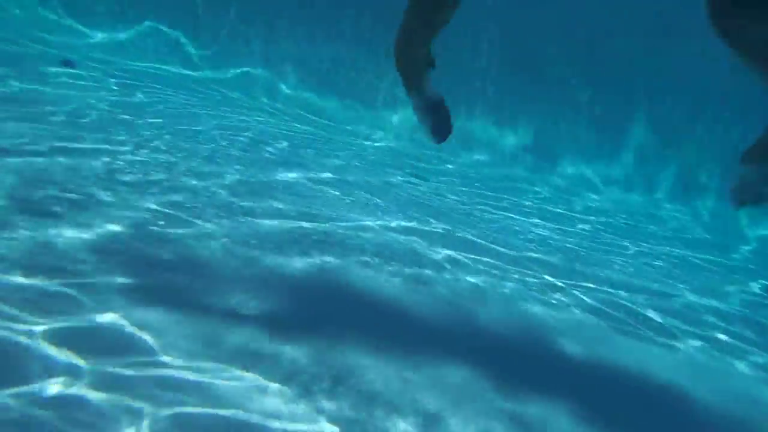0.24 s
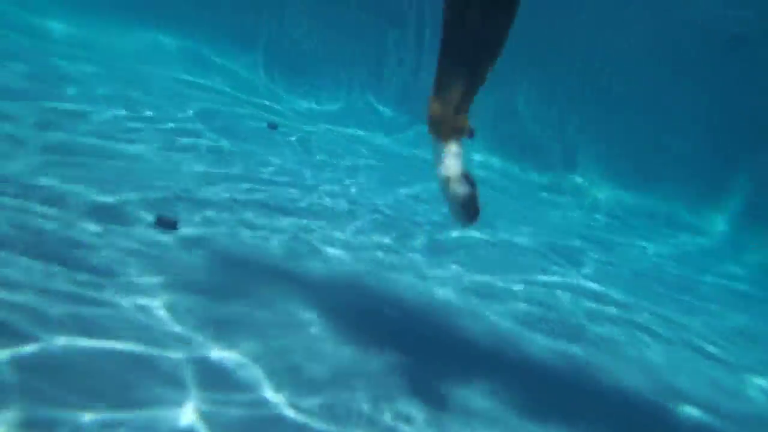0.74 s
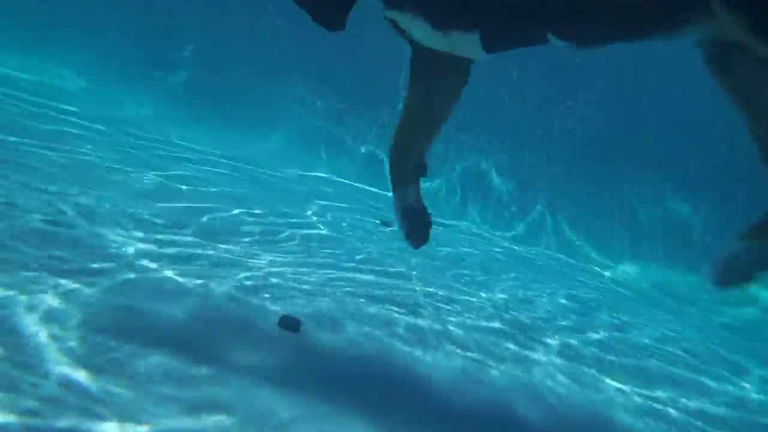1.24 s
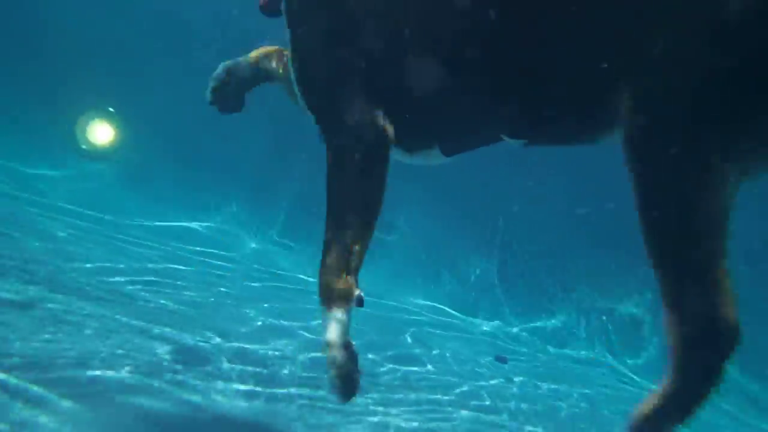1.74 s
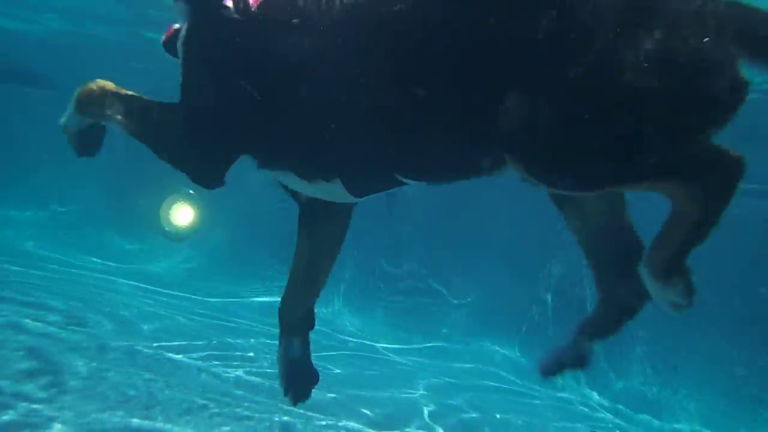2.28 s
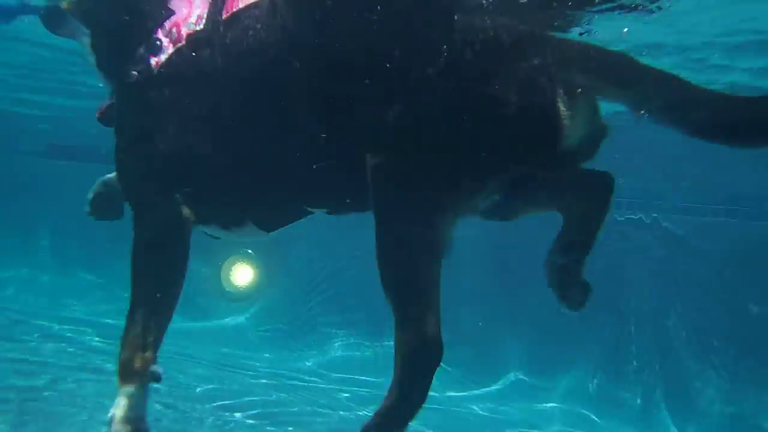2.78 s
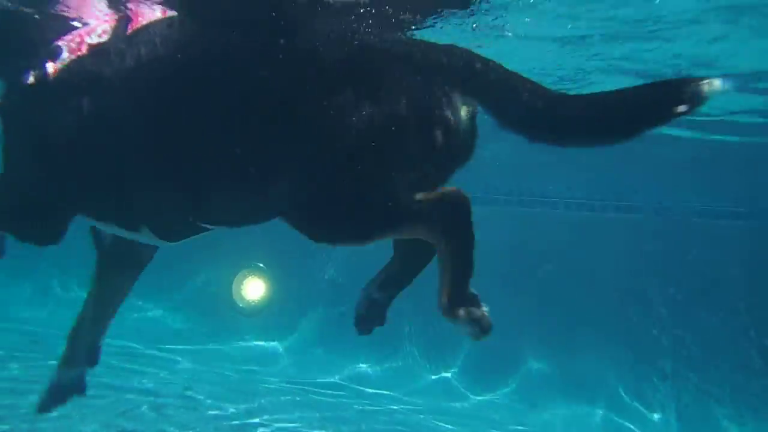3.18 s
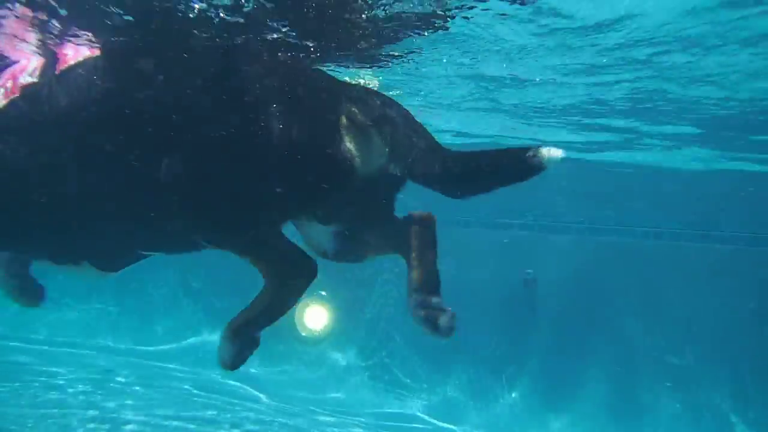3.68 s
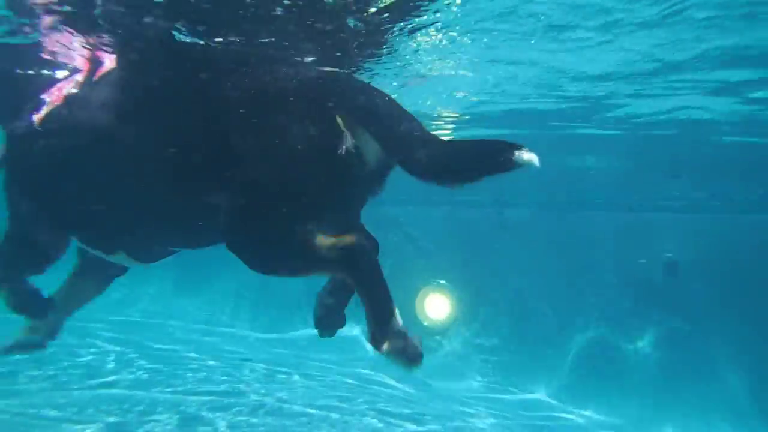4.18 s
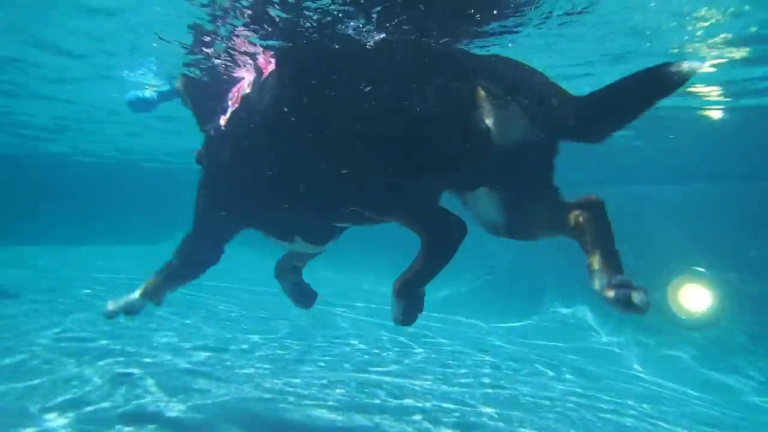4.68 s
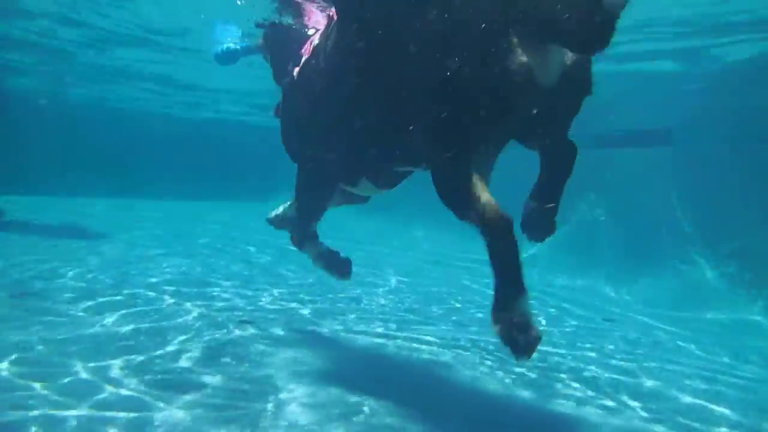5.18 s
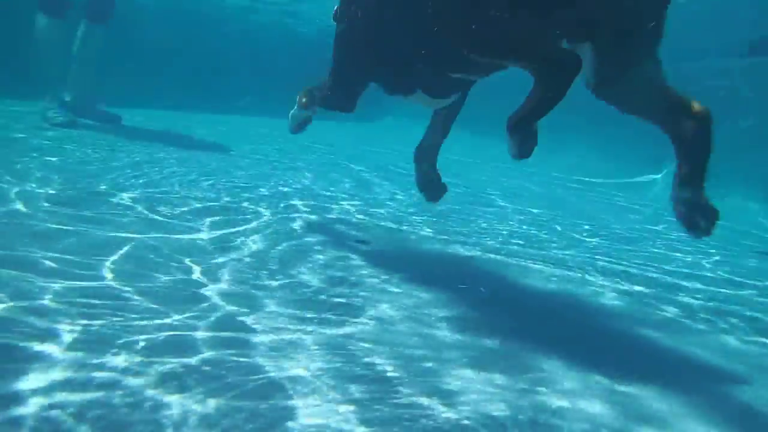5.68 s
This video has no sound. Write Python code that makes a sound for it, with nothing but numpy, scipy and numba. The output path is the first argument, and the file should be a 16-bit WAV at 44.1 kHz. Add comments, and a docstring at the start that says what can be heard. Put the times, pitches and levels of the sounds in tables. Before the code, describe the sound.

Muffled, resonant water noise opens strongly and keeps surging, coloured by the air pocket inside a submerged housing. Dull paddling slaps, rising bubble blips, faint ticks and short creaking jolts dot it. After about four seconds, close handling takes over: bassy bumps, finger rubs and hard clicks at the left side. The wash fades beneath, then swells back with low shoves, creaks and a last gurgle.

```python
"""From the start, a dog paddling past a sealed camera under water stirs a wash: noise through the modes of the case.
Strokes soon slap its air cavity, bubbles gurgle as rising tones, faint treble ticks come, and seams creak in jolts.
In mid-scene spray crackles and waves shove the case as dying low tones. Then a shifting hand thuds, rubs and ticks,
mostly at the left port, as band-shaped noise and cavity rings, while the wash sinks. At the end the wash returns,
with more shoves and creaks. A limiter holds the peaks throughout."""
import sys
import numpy as np
from scipy.fft import rfft, irfft, next_fast_len
from scipy.io import wavfile
from scipy.ndimage import uniform_filter1d, minimum_filter1d, map_coordinates
from numba import njit

SR = 44100
rng = np.random.default_rng(int(sys.argv[2]) if len(sys.argv) > 2 else 0)


def master(y):
    """Save y as 16-bit WAV."""
    cut = np.clip(np.atleast_2d(y).T, -1, 1)
    pcm = np.round(cut * 32767)  # scale
    wavfile.write(sys.argv[1], SR, pcm.astype(np.int16))


N = 261513

# Wash envelope: t/s, slosh level/dB, gulp level/dB, cavity ring level/dB, cavity f/Hz
WASH_COURSE = [(0, -13.5, -39, -16, 582.5), (.12, -25, -35, -25.5, 550), (.5, -24.5, -34, -22, 523),
               (.8, -28.5, -41, -23.5, 551), (1.15, -24.5, -36, -17, 533.3), (2.55, -25, -33.5, -16, 533.7),
               (2.74, -22, -20, -16, 581.5), (3.02, -28.5, -23.5, -19, 600), (3.4, -25.5, -31, -19, 561.5),
               (3.85, -24.5, -28, -23, 563.6), (3.95, -25, -39.5, -17, 598.8),
               (4.02, -22.5, -28, -18.5, 568), (4.14, -27.5, -27, -24, 518), (4.2, -28, -42, -33.5, 530),
               (4.35, -36.5, -49, -42.5, 527.2), (4.75, -43.5, -46, -44.5, 521.5),
               (4.87, -25.5, -40, -33.5, 520), (5.0, -32.5, -22.5, -28.5, 519.4),
               (5.18, -27, -26.5, -17, 527.7), (5.65, -26, -31.5, -17.5, 508.8),
               (5.93, -30.5, -21.5, -17, 548.4)]
# Fizz of the pool in the walls: t/s, level/dB
FIZZ_COURSE = [(0, -38), (.49, -42.5), (.9, -44), (1.09, -39.5), (2.28, -40.5), (2.61, -40), (2.99, -46),
               (3.35, -41), (3.6, -36), (4.0, -36.5), (4.13, -39.5), (4.23, -59), (4.48, -68.5),
               (4.78, -68.5), (4.86, -64), (4.99, -60.5), (5.22, -55), (5.93, -46.5)]
# Balance of the wash: t/s, broad base level/dB under the cavity ring, upper wall level/dB
WASH_BALANCE = [(0, 7.5, 1), (.8, 1.5, 1), (1.8, -3.5, -1.5), (3.3, 0.5, -3), (3.8, 4.5, -6),
                (4.23, 0.5, -4), (4.75, 0.5, -11), (5.0, -1.5, 1.5), (5.3, -9, 0.5)]
# How alike the two air pockets are tuned: t/s, share/1
POCKET_LIKENESS = [(2.55, 0.48), (2.7, 0.87), (4.1, 0.9), (5.0, 0.13)]
# Slosh spectrum: f/Hz, relative level/dB per Hz
SLOSH_SPECTRUM = [(13, -65), (22, -25), (54, -19), (76, -3.5), (97, -1), (172, -3), (241, 4.5), (260, -2.5),
                  (281, -12), (300, -22.5), (390, -45.5), (660, -120)]
# Broad base under the cavity ring: f/Hz, relative level/dB per Hz
BASE_SPECTRUM = [(220, -49.5), (380, -14), (535, -1), (635, -2.5), (697, -7.5), (836, -20), (1420, -36.5),
                 (3120, -120)]
# Hiss spectrum: f/Hz, relative level/dB per Hz
HISS_SPECTRUM = [(3000, -28), (3900, -9.5), (4300, -2), (5600, 1), (7200, -0.5), (11000, -4.5), (15900, -6)]
# Wall modes of the case: f/Hz, width/Hz of one pass, relative level/dB
WALL_MODES = [(1635, 240, 5), (1876, 324, 7), (2032, 67, -2), (2800, 920, -7), (3310, 63, -15)]
# Tilt between the ports: f/Hz, left-over-right level/dB
PORT_TILT = [(420, 2), (550, 8.5), (650, -10), (1000, -1), (1900, -2.5), (2300, -3.5), (3000, -13.5),
             (3600, -11.5), (4500, 7.5)]
# Lag between the ports: f/Hz, phase/rad by which left leads
PORT_LEAD = [(480, -0.6), (620, -2.5), (730, -1.2), (1200, 1.24), (1450, -1.44), (1650, 1), (1900, -1.13),
             (2450, -1.23), (3200, -0.8)]
# Water slaps on the cavity: t/s, level/dB before the soft onset
SLAP_EVENTS = [(0.127, -12), (0.184, -15), (0.234, -3.5), (0.358, -6.5), (0.486, -10.5), (0.548, -9),
               (0.677, -11.5), (0.699, -10.5), (1.123, -7.5), (1.408, -9), (1.836, -9), (1.912, -4),
               (1.968, -10), (2.302, -7), (2.612, -10.5), (2.759, -5), (3.164, -11), (3.297, -10),
               (3.732, -12), (3.787, -13), (5.788, -9.5)]
# Waves shoving the whole case: t/s, level/dB before the soft onset, f/Hz
SHOVES = [(2.82, -21, 62.3), (5.05, -27, 47.5), (5.2, -29.5, 59.96)]
# Crackle of fine bubbles: t/s, duration/s, level/dB before its random flicker
SPRAY_EVENTS = [(2.69, 0.14, -64.5)]
# Pressure of the palm: t/s, thud level/dB, boom f/Hz
PALM_COURSE = [(4.06, -21, 99.74), (4.108, -23.5, 106.3), (4.165, -9.5, 148.7), (4.225, -14.5, 156.9),
               (4.272, -22.5, 96.2), (4.325, -14.5, 116.7), (4.386, -25.5, 106.1), (4.505, -19.5, 105.6),
               (4.532, -38, 100.9), (4.586, -25, 111), (4.8, -30, 109.2)]
# Palm thud spectrum: f/Hz, relative level/dB per Hz
THUD_SPECTRUM = [(13, -55.5), (22, -24), (60, -8.5), (160, -2.5), (220, -7.5), (280, -33.5), (880, -120)]
# Rubbing spectrum: f/Hz, relative level/dB per Hz
RUB_SPECTRUM = [(120, -24), (200, -13.5), (232, -7), (412, -5.5), (521, -6.5), (614, -2.5), (917, -31.5),
                (1600, -61.5), (3520, -120)]
# Slips of the fingers: t/s, duration/s, level/dB
FINGER_SLIPS = [(4.188, 0.046, -19), (4.237, 0.042, -20.5), (4.268, 0.087, -26.5), (4.349, 0.026, -18.5),
                (4.382, 0.061, -19), (4.443, 0.029, -22.5), (4.455, 0.067, -19.5), (4.511, 0.033, -31),
                (4.562, 0.069, -29), (4.624, 0.051, -20), (4.668, 0.049, -18), (4.716, 0.051, -21.5),
                (4.818, 0.027, -19.5), (4.843, 0.037, -23), (4.879, 0.13, -30)]
# Skin scraping on the case: t/s, duration/s, level/dB before its random flicker
SKIN_SCRAPES = [(4.46, 0.057, -54), (4.67, 0.027, -56)]
# Ticks of the case under the hand: t/s, burst level/dB, cavity ring level/dB, left-over-right level/dB
CASE_TICKS = [(4.2115, -28.5, -36, 14.5), (4.2505, -29.5, -27, 19.5), (4.2565, -22.5, -29, 16),
              (4.3325, -27.5, -29.5, 19.5), (4.358, -29.5, -24, 26), (4.4052, -28.5, -19, 28),
              (4.4232, -24, -19, 25.5), (4.4440, -34.5, -41.5, 19), (4.4558, -6, -15.5, 15),
              (4.4740, -34, -23, -1.5), (4.4852, -18, -23, 11), (4.4915, -34.5, -41, 7),
              (4.6474, -39.5, -36, 20), (4.6518, -29, -22.5, 24.5), (4.688, -40.5, -24, 14.5),
              (4.6995, -15.5, -24.5, 17.5), (4.7360, -35.5, -35, 18.5)]
# Clumps of bubbles: t/s, duration/s, level/dB, lowest f/Hz, highest f/Hz
BUBBLE_CLUMPS = [(0.207, 0.031, -29, 662, 1118), (0.606, 0.026, -32.5, 723, 1434),
                 (0.671, 0.053, -22, 643, 951), (0.686, 0.029, -32.5, 1100, 1332),
                 (0.79, .075, -28.5, 697, 1117), (1.403, 0.03, -23.5, 656, 1095),
                 (1.592, 0.026, -22, 773, 1226), (2.434, 0.027, -35, 910, 2253),
                 (3.682, .04, -28, 802, 953), (5.804, .07, -17.5, 557, 660)]
# Seam creaks: t/s, number of jolts, f/Hz, blip level/dB, wall ring level/dB, low body level/dB, edge level/dB
SEAM_CREAKS = [(0.618, 5, 3520, -33.5, -27.5, -30, -60), (0.627, 1, 3600, -27, -35.5, -32, -50.5),
               (1.596, 8, 3094, -29.5, -20, -26.5, -45.5), (2.7343, 1, 3000, -41, -35, -43.5, -43.5),
               (2.735, 3, 1670, -30.5, -24.5, -20, -44.5), (5.0545, 1, 3494, -43, -29.5, -34.5, -48),
               (5.0800, 1, 3540, -40.5, -37.5, -43.5, -50.5), (5.371, 1, 1780, -34, -25, -36.5, -85),
               (5.501, 1, 1880, -32, -30.5, -40.5, -82), (5.544, 2, 1850, -41, -31.5, -49, -82),
               (5.706, 1, 2310, -39.5, -45.5, -42.5, -76.5)]
# Faint ticks on the tallest crests of the wash: t/s, level/dB before filter and output gain
CREST_TICKS = [(0.359, -46.5), (0.6917, -44), (1.226, -46.5), (1.4112, -46), (1.427, -48.5), (1.674, -48.5),
               (1.8798, -46.5), (2.2667, -45), (2.616, -51.5), (2.7244, -47.5), (2.7612, -46),
               (2.7765, -47), (2.8153, -51), (2.8368, -51.5), (2.944, -50), (3.0052, -52), (3.932, -45.5),
               (4.1761, -53.5), (4.3088, -53), (5.1885, -50), (5.3547, -58.5)]

HISS_DB, HISS_FOLLOWS = -61, 0.68  # hiss level at the median fizz; dB of hiss per dB of upper-wall fizz
SLOSH_HEAVE_DB, RING_HEAVE_DB, GULP_HEAVE_DB = 0.5, 0.46, 2  # scale of the random swells
SLAP_RISE_S, SLAP_T60_S = 0.003, 0.06
SHOVE_RISE_S, SHOVE_T60_S = 0.0077, 0.28
PALM_PAN_DB, SLIP_PAN_DB = 7.5, 16  # left over right
BOOM_DB, BOOM_SPREAD_HZ = -1.5, 34  # boom relative to the broad thud; spread to either side of its pitch
TRAVEL = 0.36  # largest swing of the pressed membranes
CRACK_DB, CRACK_GROWS = -22, 1.1  # crack at the hardest burst; dB of crack per dB of burst
CREAK_HZ, CREAK_JITTER, GRIT = 285, 0.03, 0.2  # jolts a second, scatter in periods, noise in a jolt
JOLT_S, DAMPING_HZ = 0.00105, 90  # rise of a jolt, extra width of the wall modes
BODY_HZ, BODY_WIDTH_HZ, EDGE_HZ = 1060, 450, 5100  # low mode of the seam, bright edge
CREST_S = 0.0004  # time to the peak of a crest tick
TOP_HZ = 15830


def amp(db):
    """Level in decibels becomes an amplitude ratio."""
    return 10 ** (np.asarray(db) / 20)


def unit(x):
    """Normalisation to an rms of 1."""
    return x / np.sqrt(np.mean(x ** 2) + 1e-20)


def along(points, hz):
    """Linear interpolation of a response over logarithmic frequency."""
    f, v = np.transpose(points)
    return np.interp(np.log(hz + 1), np.log(f + 1), v)


def curves(rows):
    """Linear interpolation in time, one curve for each column after t."""
    s, *cols = np.transpose(rows)
    return [np.interp(np.arange(N) / SR, s, c) for c in cols]


def wobble(rate):
    """A smooth random modulation, interpolated from rate knots a second."""
    knots = rng.standard_normal(int(N * rate / SR) + 4)
    return map_coordinates(knots, [np.arange(N) * rate / SR])


def filtered(x, response):
    """Linear filtering: the spectrum is multiplied by a complex response."""
    m = next_fast_len(N + SR // 2)
    return irfft(rfft(x, m) * response(np.fft.rfftfreq(m, 1 / SR)), m)[..., :N]


def noise(spectrum, channels=1):
    """Spectral shaping turns white noise into coloured noise of rms 1."""
    white = rng.standard_normal((channels, N))
    return unit(filtered(white, lambda hz: amp(along(spectrum, hz))))


def mode(f, hz, width_hz):
    """Second-order resonance with gain 1 at its centre."""
    return 1j * f * width_hz / (hz * hz - f * f + 1j * f * width_hz)


def riding_noise(channels, centre_hz, spread_hz):
    """Modulation of a carrier by slow noise gives a narrow band that follows a drifting pitch."""
    slow = filtered(rng.standard_normal((2, channels, N)), lambda hz: 1 / (1 + (hz / spread_hz) ** 2))
    carrier = np.exp(2j * np.pi * np.cumsum(centre_hz) / SR)
    return unit(np.real((slow[0] + 1j * slow[1]) * carrier))


def sides(pan_db):
    """Level panning: left and right gains whose mean is 1."""
    left = amp(pan_db)
    return 2 * np.array([left, np.ones_like(left)]) / (1 + left)


def ports(x, loose):
    """Level and phase differences carry one sound to both ports; the loose part is separate at each."""
    half = np.array([[.5], [-.5]])

    def response(hz):
        return amp(half * along(PORT_TILT, hz)) * np.exp(1j * half * along(PORT_LEAD, hz))

    return filtered(x[:1] + loose * x[1:], response)


def muffled(x):
    """Low-pass transmission: the case passes little above its last wall mode."""
    return filtered(x, lambda hz: 1 / np.sqrt(1 + (hz / 3700) ** 30))


def swells(rows):
    """Envelope superposition: each row adds half a sine cycle of gain."""
    t = np.arange(N) / SR
    return sum(amp(db) * np.sin(np.pi * np.clip((t - s) / length, 0, 1)) for s, length, db in rows)


def pushes(rows, rise_s, t60_s):
    """Impulsive excitation: each row starts a soft-edged tone that decays exponentially."""
    out, t = np.zeros(N + SR), np.arange(SR // 4) / SR
    for s, db, hz in rows:
        shape = (1 - np.exp(-(t / rise_s) ** 2)) * amp(db - 60 * t / t60_s)
        out[round(s * SR):][:len(t)] += shape * np.sin(2 * np.pi * (hz * t + rng.random()))
    return out[:N]


def wash():
    """Resonance under turbulent forcing: moving water excites the drifting air cavity and the case walls."""
    slosh_db, gulp_db, ring_db, cavity_hz = curves(WASH_COURSE)
    fizz_db, = curves(FIZZ_COURSE)
    base_db, upper_db = curves(WASH_BALANCE)
    even, = curves(POCKET_LIKENESS)
    surge = wobble(11)  # shared by ring and fizz

    ring = 0.7 * riding_noise(3, cavity_hz, spread_hz=47) + amp(base_db) * noise(BASE_SPECTRUM, channels=3)
    ring = unit(ring) * amp(ring_db + RING_HEAVE_DB * surge + wobble(25))
    # pockets tuned alike ring without the tilt and lag
    ring = even * (ring[:1] + 0.35 * ring[1:]) + (1 - even) * ports(ring, loose=0.14)

    slosh = noise(SLOSH_SPECTRUM) * amp(slosh_db + SLOSH_HEAVE_DB * wobble(11))
    gulp = unit(filtered(rng.standard_normal(N), lambda f: mode(f, 301, 220) ** 4))
    gulp = unit(gulp * amp(GULP_HEAVE_DB * wobble(12))) * amp(gulp_db)

    def walls(f):
        return sum(amp(db) * mode(f, hz, width) ** 2 for hz, width, db in WALL_MODES)

    fizz = unit(filtered(rng.standard_normal((3, N)), walls))
    fizz = fizz * amp(fizz_db + 0.65 * surge + 1.1 * wobble(30))
    fizz = muffled(ports(fizz, loose=0.25))
    upper = filtered(fizz, lambda hz: 1 / (1 + (2350 / (hz + 1)) ** 16))
    fizz = fizz + (amp(upper_db) - 1) * upper  # the high wall modes wax and wane apart from the low ones

    # lower hiss drives the ports in opposite phase; each port adds its own over the full band
    opposed = filtered(noise(HISS_SPECTRUM), lambda hz: 1 / (1 + (hz / 7800) ** 12)) * [[1], [-1]]
    hiss_db = HISS_DB + HISS_FOLLOWS * (fizz_db + upper_db - np.median(fizz_db))
    hiss = amp(hiss_db) * (1.1 * opposed + noise(HISS_SPECTRUM, channels=2))
    return ring + slosh + gulp + fizz + hiss


def strokes():
    """Impulse response: slaps ring the cavity, waves shove the case and spray crackles as flickering noise."""
    cavity_hz = curves(WASH_COURSE)[-1]
    slaps = pushes([(s, db, cavity_hz[round(s * SR)]) for s, db in SLAP_EVENTS], SLAP_RISE_S, SLAP_T60_S)
    even, = curves(POCKET_LIKENESS)
    slaps = even * slaps + (1 - even) * ports(np.array([slaps, slaps, slaps]), loose=0)
    spray = swells(SPRAY_EVENTS) * noise(HISS_SPECTRUM, channels=2) * amp(4 * wobble(300))
    return slaps + pushes(SHOVES, SHOVE_RISE_S, SHOVE_T60_S) + spray


def grip():
    """Contact and friction: the palm thuds and booms the case; slips rub, the far port hearing only their ring."""
    thud_db, boom_hz = curves(PALM_COURSE)
    t = np.arange(N) / SR
    onset = np.clip((t - PALM_COURSE[0][0]) / 0.063, 0, 1)
    release = np.clip((PALM_COURSE[-1][0] - t) / 0.008, 0, 1)
    lumps = amp(2.5 * np.array([wobble(30), wobble(30)]))
    boom = riding_noise(2, boom_hz, BOOM_SPREAD_HZ)
    thud = unit(noise(THUD_SPECTRUM, channels=2) * lumps + amp(BOOM_DB) * boom)
    thud = onset * release * thud * amp(thud_db) * sides(PALM_PAN_DB)[:, None]

    near, far = noise(RUB_SPECTRUM, channels=2)
    far = unit(filtered(far, lambda f: mode(f, 760, 250)))
    rub = swells(FINGER_SLIPS) * sides(SLIP_PAN_DB)[:, None] * [near, far]

    # membranes of limited travel saturate
    pressed = TRAVEL * np.tanh((thud + rub) / TRAVEL)
    pressed = filtered(pressed, lambda hz: 1 / (1 + (hz / 1300) ** 6))
    scrape = filtered(rng.standard_normal((2, N)), lambda f: mode(f, 1800, 2000) ** 2)
    return pressed + swells(SKIN_SCRAPES) * unit(muffled(scrape)) * amp(2.6 * wobble(150))


def ticks():
    """Impact with saturation: a cavity ring squared off by hard blows, a mid-band burst and a sharp crack."""
    crack, body, ring = np.zeros((3, 2, N + SR))
    t = np.arange(SR // 30) / SR
    hardest_db = max(db for _, db, *_ in CASE_TICKS)
    for s, db, ring_db, pan_db in CASE_TICKS:
        pan = sides(pan_db)[:, None]
        at = slice(round(s * SR), round(s * SR) + len(t))
        crack_db = CRACK_DB + CRACK_GROWS * (db - hardest_db)  # harder blows are sharper
        crack[:, at] += pan * amp(crack_db - 60 * t / 0.009) * rng.standard_normal(len(t))
        body[:, at] += pan * amp(db - 60 * t / 0.015) * rng.standard_normal(len(t))
        swing = pan * amp(ring_db - 60 * t / 0.034) * (1 - np.exp(-t / 0.00051))
        swing = swing * np.sin(2 * np.pi * 760 * t)
        ring[:, at] += 0.83 * np.tanh(swing / 0.4)
    bright = filtered(crack[:, :N], lambda f: mode(f, 5100, 6000) ** 2)
    burst = muffled(filtered(body[:, :N], lambda f: mode(f, 1200, 1900) ** 2))
    return bright + burst + ring[:, :N]


def gurgles():
    """Bubble resonance: each gurgle is a clump of short tones whose pitch rises as they decay."""
    out = np.zeros((3, N + SR))
    for s, length, db, low_hz, high_hz in BUBBLE_CLUMPS:
        when, pitch, size = rng.random((3, 20, 1))
        pitch = (np.arange(len(pitch))[:, None] + pitch) / len(pitch)  # spread evenly over the log range
        age = np.maximum(np.arange(SR // 8) / SR - when * length, 0)
        cycles = low_hz * (high_hz / low_hz) ** pitch * age
        envelope = (1 - np.exp(-cycles / 1.1)) * np.exp(-cycles / 5)
        tones = envelope * np.sin(2 * np.pi * cycles * (1 + 0.0016 * cycles))
        clump = np.sum(amp(-6 * size) * tones, axis=0)
        rms = np.sqrt(np.sum(clump ** 2) / (length * SR))
        out[0, round(s * SR):][:len(clump)] += amp(db) * clump / rms
    return ports(out[:, :N], loose=0)


def creaks():
    """Stick-slip: each jolt of a seam is a soft blip that rings damped wall modes and has a faint bright edge."""
    body, edge = np.zeros((2, 3, N + SR))
    t = np.arange(SR // 50) / SR
    blip = (t / JOLT_S) ** 2 * np.exp(2 - 2 * t / JOLT_S)
    onset = 1 - np.exp(-(t / JOLT_S) ** 2)
    walls = onset * sum(amp(db) * np.exp(-np.pi * (width + DAMPING_HZ) * t) * np.sin(2 * np.pi * hz * t)
                        for hz, width, db in WALL_MODES)
    low = onset * np.exp(-np.pi * BODY_WIDTH_HZ * t)
    for s, jolts, hz, db, wall_db, low_db, edge_db in SEAM_CREAKS:
        late, size, bend = rng.standard_normal((3, 12))
        count = max(1, round(jolts))
        for k in range(count):
            turn = 2 * np.pi * t * (1 + 0.015 * bend[k])
            gain = amp(1.5 * size[k]) * np.sin(np.pi * (k + 0.5) / count) ** 0.3  # tends to peak in mid-run
            at = round((s + (k + CREAK_JITTER * late[k] * (k > 0)) / CREAK_HZ) * SR)
            jolt = amp(db) * blip * (np.sin(hz * turn) + GRIT * rng.standard_normal(len(t)))
            jolt += amp(wall_db) * walls + amp(low_db) * low * np.sin(BODY_HZ * turn)
            body[0, at:][:len(t)] += gain * jolt
            edge[0, at:][:len(t)] += gain * amp(edge_db - 60 * t / 0.012) * rng.standard_normal(len(t))
    bright = filtered(edge[:, :N], lambda f: mode(f, EDGE_HZ, 4500) ** 2)
    return ports(muffled(body[:, :N]) + bright, loose=0)


def crests():
    """Transient noise: each tick is a very short spit of treble, alike in both channels."""
    out, t = np.zeros(N + SR), np.arange(SR // 200) / SR
    envelope = t / CREST_S * np.exp(1 - t / CREST_S)
    for s, db in CREST_TICKS:
        out[round(s * SR):][:len(t)] += amp(db) * envelope * unit(rng.standard_normal(len(t)))
    return 2.6 * filtered(out[:N], lambda f: mode(f, 3000, 5000) ** 2)


def scene():
    """Linear superposition of all sources at the two ports."""
    return wash() + strokes() + grip() + ticks() + gurgles() + creaks() + crests()


@njit
def limiter_gain(needed, recovery):
    """Peak control: the gain drops at once to what is needed and recovers exponentially."""
    gain, g = np.empty_like(needed), 1.0
    for i in range(len(needed)):
        g = min(needed[i], g + recovery * (1 - g))
        gain[i] = g
    return gain


def record(dry):
    """Look-ahead limiting eases the gain down before each overshoot; a band limit then removes the top."""
    needed = np.minimum(1, 0.44 / (np.abs(dry).max(axis=0) + 1e-9))
    ahead = minimum_filter1d(needed, size=89)  # about 2 ms
    gain = limiter_gain(ahead, 1 / (0.053 * SR))  # recovery time constant 53 ms
    gain = uniform_filter1d(gain, size=89)
    return filtered(dry * gain, lambda hz: hz < TOP_HZ)


dry = scene()
out = record(dry)
master(out)
```